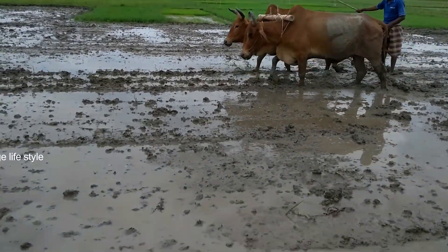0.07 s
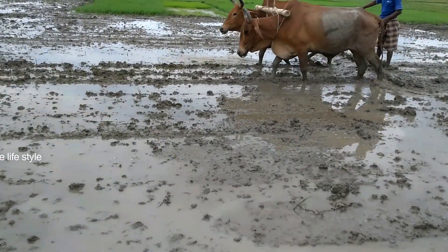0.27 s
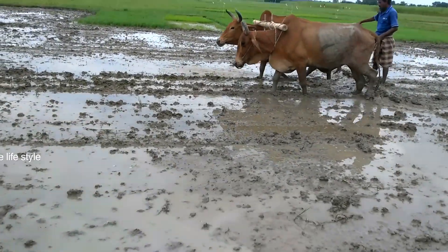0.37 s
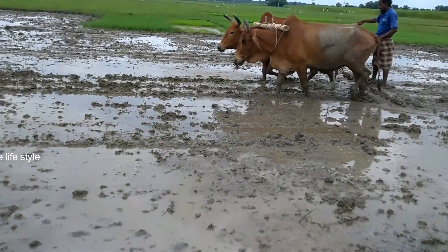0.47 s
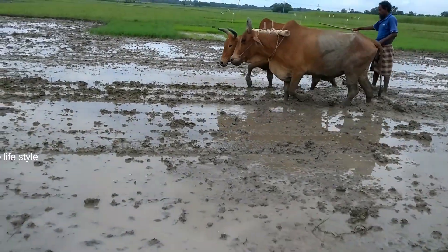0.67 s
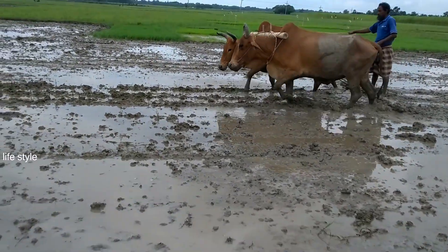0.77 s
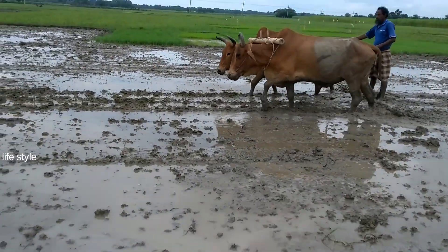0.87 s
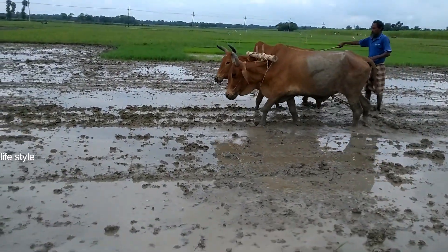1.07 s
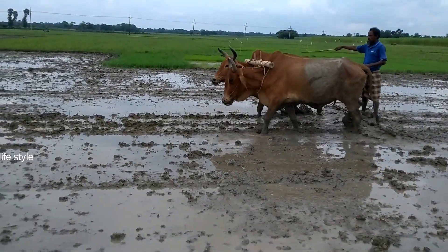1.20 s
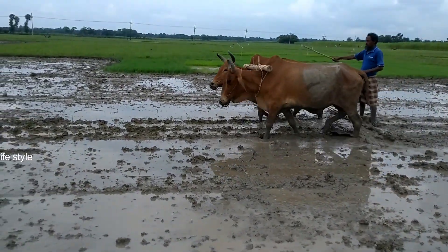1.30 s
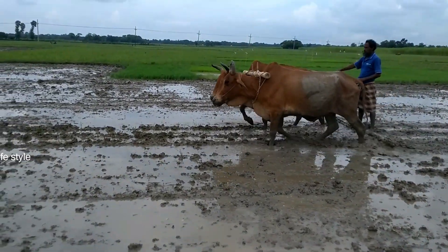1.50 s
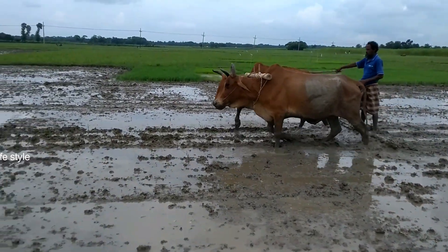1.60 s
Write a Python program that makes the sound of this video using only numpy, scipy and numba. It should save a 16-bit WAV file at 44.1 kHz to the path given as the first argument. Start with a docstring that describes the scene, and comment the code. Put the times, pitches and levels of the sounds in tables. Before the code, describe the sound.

Hooves slap and plop in a flooded muddy field while a dragged plough gurgles softly behind

```python
"""In a flooded field, a few metres from a phone, two oxen drag a plough past under faint wind.
Wind and field are filtered noise that gusts; the plough's churn is a crowd of drop tones that swells and sinks.
Hooves slap the water and throw spray, both clouds of drop tones; bubbles ring upward and mud thuds low.
The phone's two ports hear each drop with their own phase, and its body shades the treble by side.
In one narrow treble band the left-right sum is thinned."""
import sys
import numpy as np
from scipy import signal
from scipy.fft import rfft, irfft
from scipy.io import wavfile
from scipy.ndimage import uniform_filter1d
from numba import njit

SR = 44100
rng = np.random.default_rng(int(sys.argv[2]) if len(sys.argv) > 2 else 0)


def wav_record(signal):
    """Record a signal, one row per channel, as 16-bit PCM in the file named by sys.argv[1]."""
    frames = np.transpose(np.atleast_2d(signal))
    bounded = np.clip(frames, -1, 1)
    # unit amplitude maps onto the largest positive 16-bit level
    quanta = np.round(bounded * 32767).astype(np.int16)
    wavfile.write(sys.argv[1], SR, quanta)


def how_loud(loudness_db):
    """Turn decibels into a plain amplitude multiplier (0 dB gives 1, 20 dB gives 10)."""
    steps = np.asarray(loudness_db, float) / 20
    return 10 ** steps


N = 72765  # length [samples]

# Wind and open field: (frequency [Hz], relative level per Hz [dB])
FIELD_COLOUR = [(25, -13), (55, -24.5), (110, 2.5), (180, -1.5), (500, -2.5), (750, -3.5), (1200, -15.5),
                (1700, -7.5), (2500, -5), (3500, -14.5), (4300, -8.5), (5700, -12.5), (7700, -11),
                (8500, -22), (11000, -25), (15000, -40)]
FIELD_RMS_DB = -53  # as it enters the mix

# Water churned by the plough: (time [s], relative level [dB])
CHURN_LEVEL = [(0, -56.5), (.15, -55), (.32, -51), (.42, -52.5), (.58, -49), (.65, -54.5), (.75, -57.5),
               (.78, -78), (.9, -49.5), (1.0, -53), (1.1, -55.5), (1.2, -53.5), (1.3, -49.5), (1.42, -51.5),
               (1.48, -57), (1.65, -56)]
# Colour of the churned water: (frequency [Hz], relative level per Hz [dB])
CHURN_COLOUR = [(120, -12.5), (700, -4.5), (1200, -7.5), (2400, -4), (3400, -3), (5000, -10.5), (7500, -9),
                (8500, -17), (11000, -22.5), (15000, -30)]

# Hooves sinking into mud, timed 4 ms into the knock: (time [s], pitch [Hz], level [dB])
MUD_THUDS = [(0.219, 138, -42.5), (0.209, 245, -47), (0.193, 230, -55), (.281, 374, -43),
             (0.297, 171, -45.5), (0.463, 135, -49), (0.533, 131, -48), (0.539, 179, -40),
             (0.619, 135, -50.5), (0.857, 170, -55), (0.94, 203, -52), (1.186, 130, -50.5),
             (1.261, 170, -56), (1.349, 118, -49.5), (1.358, 203, -51)]
# Air bubbles trapped by the hooves: (time [s], starting pitch [Hz], level [dB], length [cycles])
AIR_BUBBLES = [(.211, 2470, -29, 24), (.474, 1900, -34.5, 14), (.506, 1630, -42, 9.1),
               (.5205, 2220, -29.5, 15), (0.534, 1510, -37.5, 22), (.548, 2056, -44, 8.9),
               (0.877, 1570, -43, 19), (0.884, 2000, -38, 12), (.905, 2000, -39.5, 21),
               (.207, 2130, -37, 16), (1.165, 2060, -41, 23), (1.165, 1310, -43, 18),
               (1.164, 593, -50.5, 11), (1.196, 1350, -48.5, 11), (1.212, 458, -52.5, 9.5),
               (1.245, 670, -43.5, 9.8), (1.27, 1944, -47, 14), (.221, 469, -47.5, 14.5),
               (1.319, 2980, -41, 14), (1.338, 680, -39, 7.6), (.277, 746, -38.5, 6), (.286, 598, -39, 5.8),
               (0.526, 1850, -35, 14), (1.338, 2894, -31, 11), (1.342, 3620, -31, 19),
               (1.39, 2230, -41, 5.9), (1.365, 1830, -38, 12)]
BUBBLE_GLIDE = 0.0025  # fractional pitch rise per cycle of the starting pitch

# Sharp slaps on the surface: (time [s], relative level [dB], treble left over right [dB])
HOOF_SLAPS = [(0.2108, -14, 27), (0.2081, -23, -20), (0.212, -25.5, 19), (0.213, -37, 7), (0.2305, -32, 9),
              (.2355, -43, 3), (.2515, -35, 10), (0.28, -27, 10), (0.2664, -16, 26.5), (0.4762, -32, -7),
              (0.4943, -29, -17.5), (0.6337, -33, -4), (0.7243, -27, 9), (0.8384, -30.5, -15),
              (0.9063, -33.5, -19), (0.962, -39, 19.5), (1.3389, -30.5, -14), (1.342, -32.5, -18),
              (1.345, -42, -8), (1.358, -32, -20), (0.748, -42, 9)]
SLAP_TOP_DB, SLAP_LOW_HZ = -4, 1890  # change over the shelf; slaps thin out below this pitch

# Spray thrown by a hoof, timed at the end of its rise: (time [s], hold [s], relative level [dB],
# treble left over right [dB], tilt under the knee [dB], tilt over the shelf [dB])
HOOF_SPRAYS = [(0.075, 0.0044, -54, -20.5, 1, -7), (.130, 0.0078, -51.5, -8, 7, 3),
               (0.187, 0.0071, -39.5, 2, 1, -6), (0.206, 0.0024, -30.5, 3.5, -7, 11),
               (0.21, 0.0041, -23.5, 4, -13, -3), (0.218, 0.0046, -29.5, 17, -5.5, -9),
               (0.225, 0.013, -31, 12, -5, 1.5), (0.252, 0.016, -33, 18, -1, 4),
               (0.268, 0.019, -38.5, 8.5, 7, 3), (0.451, 0.0098, -47, -5, 4, -1),
               (0.472, 0.005, -39.5, -14, 6.5, -1), (0.485, .004, -47.5, -17, -7, -1),
               (0.496, 0.0093, -45, -14, -10, -6), (0.52, 0.031, -51.5, -14, 20, 0.5),
               (0.623, 0.0085, -51.5, -8, -20, 6), (0.721, 0.019, -49.5, 15.5, 5.5, -6.5),
               (0.808, 0.005, -55, -2, -8, -16), (0.839, 0.016, -50, -13.5, 4, 3),
               (0.869, 0.022, -60, 3, 25, -6), (0.908, 0.015, -53, -16.5, 8.5, -0.5),
               (0.957, .023, -51, 18, -4, 0), (1.158, 0.037, -65.5, -5, 30.5, -9),
               (1.266, 0.023, -66.5, -14, 27, -2), (1.314, .02, -49, -20, 7.5, 1.5),
               (1.338, 0.01, -39.5, -10, 10, -19), (1.355, 0.026, -47.5, -14, 14.5, -2.5),
               (1.388, .02, -53.5, -10, 15.5, 1), (1.527, 0.018, -58, 3, 14.5, -3)]
# Colour shared by spray and slaps: (frequency [Hz], relative level per Hz [dB])
SPLASH_COLOUR = [(120, -23), (700, -15), (1200, -15), (2400, -10), (3300, -8.5), (3900, -9), (4400, -2.5),
                 (6300, -3.5), (7600, -8), (8600, -6.5), (11000, -10.5), (15000, -24)]
SPRAY_ATTACK_S, SPRAY_T60_S, KNEE_HZ = 0.0034, 0.07, 3400
SPRAY_LOW_PAN_DB = -3.5  # left over right below the shaded treble

# Short scatter off mud ridges and the animals' legs, against the direct sound
RIDGE_T60_S, SPRAY_RIDGE_DB, SLAP_RIDGE_DB = 0.016, -5, -4

# The phone's two ports: (frequency [Hz], left lag [rad], likeness [0-1], left over right [dB])
PORTS = [(59.7, 3, 0.5, -23), (170, 0.46, 1, 9.5), (513, 1.02, 0.58, 0.5), (880, 2.15, 0.84, 4),
         (1220, 2.57, 1, 1.5), (2020, 1.93, 0.36, 5), (3000, 2.3, 0.18, 3.5), (2850, 3.4, 0.41, -4),
         (3600, 3.22, 1, 12.5), (3980, 2, 0.04, -0.5), (5300, 2.4, 0.04, -5.5), (13100, 2.3, .2, 11)]
SHADE_HZ = 4130  # the body shades one side above this
SHELF_HZ, SHELF_DB = 7936, -13.5  # step down in the phone's treble
THIN_SUM_HZ = (3279, 3830)  # band where the left-right sum is thinned
BACKGROUND_SUM_DB = -30  # gain of the background's left-right sum in that band
# Gain of the hoof sounds' sum in that band; above 0 dB counts as 0: (time [s], level [dB])
STEPS_SUM = [(0, -24), (.19, -27), (.215, -15), (.23, -20), (.255, -34), (.27, -0.5), (.47, -6), (.49, -25),
             (1.28, -19), (1.31, 10), (1.37, 2), (1.4, -27)]


def read(table, hz, column=1):
    """Table value on a log-frequency axis."""
    rows = np.array(table, float)
    return np.interp(np.log(hz), np.log(rows[:, 0]), rows[:, column])


@njit
def ring(start, hz, cycles, glide, size, phase, count, rate):
    """Short tones that swell and die, one per drop, in two channels."""
    out = np.zeros((2, count))
    for drop in range(len(start)):
        swell = cycles[drop] * rate / hz[drop] / 4  # samples to the peak
        turn = 2 * np.pi * hz[drop] / rate
        angle = 0.
        for i in range(int(7 * swell) + 2):
            k = start[drop] + i
            if 0 <= k < count:
                envelope = i / swell * np.exp(1 - i / swell)
                out[0, k] += envelope * size[0, drop] * np.sin(angle + phase[0, drop])
                out[1, k] += envelope * size[1, drop] * np.sin(angle + phase[1, drop])
            angle += turn
            turn *= 1 + glide * hz[drop] / rate
    return out


def drops(s, hz, db, cycles, pan_db, glide=0., low_pan_db=0., loose=0.93):
    """Drops as the two ports hear them: lag and likeness by pitch, treble shaded by side."""
    shade = 1 / (1 + (SHADE_HZ / hz) ** 10)
    pan = read(PORTS, hz, column=3) + low_pan_db + (pan_db - low_pan_db) * shade
    size = how_loud(db + np.array([pan, -pan]) / 2)
    # The less alike the ports, the more the left phase strays from its lag
    likeness = np.clip(read(PORTS, hz, column=2), .01, .999)
    spread = loose * np.sqrt(-2 * np.log(likeness))
    common, stray = rng.standard_normal((len(s), 2)).T
    right = 3 * common
    left = right - read(PORTS, hz) + spread * stray
    start = (s * SR).astype(np.int64)
    return ring(start, hz, cycles + 0 * hz, glide, size, np.array([left, right]), N, 1. * SR)


def cloud(count, size, colour, scatter_db):
    """Place 0-1, pitch and level of random drops whose sum has the given colour."""
    place, pitch, luck = np.moveaxis(rng.random((count, size, 3)), 2, 0)
    hz = 100 * 155 ** (pitch ** .6)
    # Makes up for shorter rings and for how thickly the drops lie in pitch
    per_hz = 20 * np.log10(hz / 5000) + 10 * np.log10(pitch ** -.67)
    scatter = -scatter_db * np.log(1 - .985 * luck)  # a few drops stand out
    return place, hz, read(colour, hz) + scatter + per_hz


def thin_sum(x, sum_db):
    """Turns down what left and right share in one narrow band, leaving their difference."""
    hz = np.fft.rfftfreq(N, 1 / SR)
    low, high = THIN_SUM_HZ
    inside = 1 / (1 + ((2 * hz - low - high) / (high - low)) ** 12)
    shared = irfft(rfft(x.mean(axis=0)) * inside, N)
    return x - shared * (1 - how_loud(np.minimum(sum_db, 0)))


def ridges(x, tail_db):
    """Mud ridges and the animals' legs add a short noise tail, leaving the broad colour alone."""
    t = np.arange(2048) / SR
    tail = rng.standard_normal(len(t)) * how_loud(-60 * t / RIDGE_T60_S)
    response = 1 + how_loud(tail_db) * rfft(tail) / np.sqrt(np.sum(tail ** 2))
    # Even out the broad colour, keep the fine ripple
    broad = np.sqrt(uniform_filter1d(abs(response) ** 2, size=9))
    echo = irfft(response / broad)
    lead = 128  # samples kept ahead of the direct sound
    smeared = signal.fftconvolve(x, np.roll(echo, lead)[None], axes=1)
    return 1.117 * smeared[:, lead:N + lead]


def walk(rate):
    """Random levels, one every 1 / rate s, joined by straight slides."""
    k = int(SR / rate)
    held = np.repeat(rng.standard_normal(N // k + 1), k)
    return uniform_filter1d(held, k)[:N]


def field():
    """Wind and distant hiss: noise in overlapping octave bands, the bass gusting more."""
    hz = np.fft.rfftfreq(N, 1 / SR) + 1
    shared, own = rfft(rng.standard_normal((2, N)))
    like = np.clip(read(PORTS, hz, column=2), 0, 1)
    pan = how_loud(read(PORTS, hz, column=3) / 2)
    lagged = shared * np.exp(-1j * read(PORTS, hz))
    left = pan * (like * lagged + np.sqrt(1 - like ** 2) * own)
    both = how_loud(read(FIELD_COLOUR, hz)) * np.array([left, shared / pan])
    octaves_up = np.log2(hz / 50)
    out, gust = 0, walk(4.03)
    for octave in range(9):
        share = np.clip(1 - abs(octaves_up - octave), 0, 1)
        if octave == 0:
            share = share - octaves_up.clip(-1, 0)  # the lowest band takes all below 50 Hz
        flutter = (1.2 + 3. / (1 + octave)) * walk(14.)
        out = out + irfft(both * share, N) * how_loud(.8 * gust + flutter)
    return out * how_loud(FIELD_RMS_DB) / np.sqrt(np.mean(out ** 2))


def churn():
    """Fizz and gurgle that swell and sink behind the plough: drops at random times and sides."""
    place, hz, size_db = cloud(count=1, size=11000, colour=CHURN_COLOUR, scatter_db=2.0)
    s = place[0] * N / SR
    db = size_db[0] + np.interp(s, *np.array(CHURN_LEVEL).T) - 0.5
    return drops(s, hz[0], db, 11.7, pan_db=9.0 * rng.standard_normal(len(s)))


def thuds():
    """Mud gives under a hoof with a dull, low, quickly damped knock."""
    s, hz, db = np.array(MUD_THUDS).T
    return drops(s - .004, hz, db, 3.3, pan_db=0., loose=0.17)


def bubbles():
    """Trapped air rings at one pitch, rising as it dies."""
    s, hz, db, cycles = np.array(AIR_BUBBLES).T
    return drops(s, hz, db, cycles, 0., BUBBLE_GLIDE, low_pan_db=-5.0, loose=0.13)


def slaps():
    """A hoof slaps the surface: many drops start within a millisecond."""
    s, db, pan = np.array(HOOF_SLAPS).T[..., None]
    place, hz, size_db = cloud(count=len(HOOF_SLAPS), size=140, colour=SPLASH_COLOUR, scatter_db=2.1)
    top = SLAP_TOP_DB / (1 + (SHELF_HZ / hz) ** 12)
    low_cut = -10 * np.log10(1 + (SLAP_LOW_HZ / hz) ** 8)
    db = db + size_db + top + low_cut - 19.5
    s = s + .0009 * place
    return drops(s.ravel(), hz.ravel(), db.ravel(), 6.0, (pan + 0 * hz).ravel())


def sprays():
    """Each step throws a cloud of drops: quick rise, hold, dying patter."""
    s, hold, db, pan, tilt, top = np.array(HOOF_SPRAYS).T[..., None]
    place, hz, size_db = cloud(count=len(HOOF_SPRAYS), size=1300, colour=SPLASH_COLOUR, scatter_db=1.38)
    span = SPRAY_ATTACK_S + hold + 0.67 * SPRAY_T60_S
    t = place * span
    rise = 20 * np.log10(np.clip(t / SPRAY_ATTACK_S, .01, 1))
    decay = -60 * np.clip(t - hold - SPRAY_ATTACK_S, 0, None) / SPRAY_T60_S
    density = 10 * np.log10(span / 0.052)  # a longer spray spreads its drops thinner
    colour = tilt / (1 + (hz / KNEE_HZ) ** 6) + top / (1 + (SHELF_HZ / hz) ** 12)
    db = db + size_db + rise + decay + density + colour - 6.0
    s = s - SPRAY_ATTACK_S + t
    return drops(s.ravel(), hz.ravel(), db.ravel(), 8.4, (pan + 0 * hz).ravel(),
                 low_pan_db=SPRAY_LOW_PAN_DB)


def scene():
    """Field and plough behind, hooves in front, the left-right sum thinned in one band."""
    background = field() + churn()
    splashes = ridges(slaps(), SLAP_RIDGE_DB) + ridges(sprays(), SPRAY_RIDGE_DB)
    steps = thuds() + bubbles() + splashes
    steps_sum_db = np.interp(np.arange(N) / SR, *np.array(STEPS_SUM).T)
    return thin_sum(background, BACKGROUND_SUM_DB) + thin_sum(steps, steps_sum_db)


def roll_off(x):
    """The treble ends steeply here."""
    return signal.sosfilt(signal.butter(12, 16480, fs=SR, output="sos"), x)


def record(dry):
    """The phone cuts deep bass and steps down in the top treble."""
    hz = np.fft.rfftfreq(N, 1 / SR) + 1
    shelf = how_loud(SHELF_DB / (1 + (SHELF_HZ / hz) ** 60))
    bass_cut = 1 / np.sqrt(1 + (70 / hz) ** 4)
    mix = irfft(rfft(dry) * shelf * bass_cut, N)
    return roll_off(mix)


dry = scene()
out = record(dry)
wav_record(out)
```